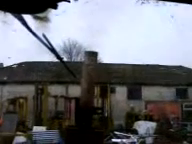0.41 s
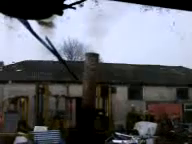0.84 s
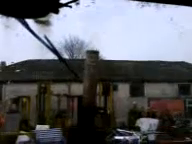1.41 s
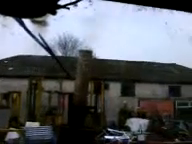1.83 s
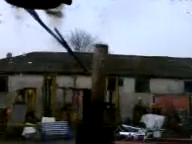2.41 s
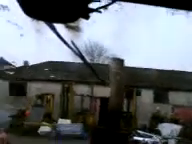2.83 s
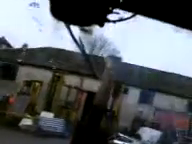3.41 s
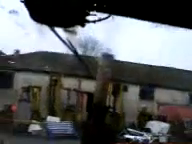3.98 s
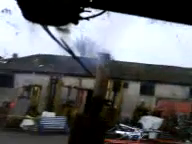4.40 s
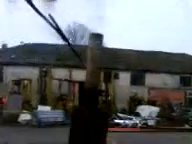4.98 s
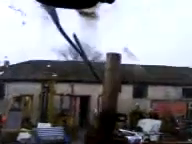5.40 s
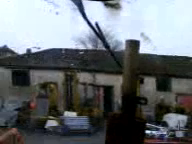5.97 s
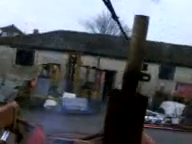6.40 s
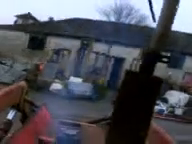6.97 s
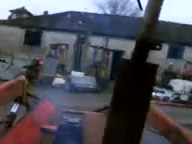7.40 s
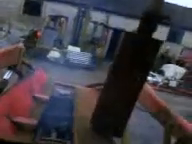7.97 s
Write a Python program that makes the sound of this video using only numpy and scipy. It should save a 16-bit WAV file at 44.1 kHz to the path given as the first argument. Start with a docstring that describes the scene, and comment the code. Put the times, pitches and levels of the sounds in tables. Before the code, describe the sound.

For the whole 8 seconds an old four-cylinder diesel tractor idles cold, heard close from inside its cab. From 0 s it is already running: exhaust firings at roughly 40 a second merge into a low throbbing boom over soft rumble, with cab air resonating. Above it valve gear knocks in a lurching pattern repeating about ten times a second, each knock a short gritty burst in loose metal, with small pings. Idle speed hunts slightly and harshness swells and eases, rough near 1 s, milder around 1.5 and 3.5 s. At 3.7 s the microphone swings and fuel-pipe rattle steps forward, the boom thinner. From 6.2 to 6.9 s it turns, bringing out a ringing rocker cover and a slightly higher panel note; clatter is harsh around 7 s. Irregular hard knocks jump out throughout. The sound is loud, compressed, lacking deep bass and treble, with flattened peaks; the engine is still running at the end.

```python
"""An old four-cylinder diesel tractor idles cold and uneven, heard from inside its cab for 8 seconds.
From the start, firings boom in the exhaust and cab over a low rumble (damped resonances, filtered noise).
The valve gear knocks in a pattern repeating every two crank turns, as bursts of noise in loose metal.
At 3.7 s the narrow-band microphone swings toward the fuel pipes; from 6.2 to 6.9 s it turns to the panel
and cover. All along, single hard knocks stick out and the highest peaks are cut flat."""
import sys
import numpy as np
from scipy import signal
from scipy.fft import rfft, irfft
from scipy.io import wavfile
from scipy.ndimage import uniform_filter1d

SR = 44100
rng = np.random.default_rng(int(sys.argv[2]) if len(sys.argv) > 2 else 0)


def ratio_of_db(decibels):
    """Turn decibels (scalar or array-like) into linear amplitude factors; 0 dB maps to 1."""
    return 10 ** (np.asarray(decibels, float) / 20)


def log_audio(samples):
    """Write samples as a 16-bit WAV file to the path given in sys.argv[1]."""
    # one column per channel
    frames = np.atleast_2d(samples).T
    # limit to full scale, then quantise
    limited = np.clip(frames, -1, 1)
    pcm = np.round(limited * 32767).astype(np.int16)
    wavfile.write(sys.argv[1], SR, pcm)


N = 356328
T = np.arange(N) / SR  # seconds
HZ = np.fft.rfftfreq(N, 1 / SR)
CYCLES = 84  # enough engine cycles to cover the scene, counted from -1
SWING_AT_S = 3.7  # the microphone swings from the exhaust side toward the fuel pipes
# When the microphone turns to face the panel and cover: start in seconds, end in seconds.
TURN_S = (6.2, 6.9)


def evened(x):
    """Scales a sound to an rms of 1."""
    return x / np.sqrt(np.mean(x ** 2) + 1e-20)


def steadied(x):
    """Divides a sound by its own rms over half a second, so slow level changes vanish."""
    return x / np.sqrt(uniform_filter1d(x ** 2, SR // 2))


def read(points):
    """Turns a (Hz, dB) curve into a gain at every frequency."""
    f, db = np.transpose(points)
    return ratio_of_db(np.interp(np.log(HZ + 1), np.log(f + 1), db))


def coloured(x, gain):
    """Filters a sound by a gain at every frequency."""
    return irfft(rfft(x) * gain, N)


def resonate(x, hz, width):
    """A resonance of gain 1: shifts the pitch hz down to zero, smooths, and shifts back."""
    turn = np.exp(2j * np.pi * np.cumsum(hz) / SR)
    r = np.exp(-np.pi * width / SR)
    smooth = signal.lfilter([1 - r], [1, -r], x / turn)
    return 2 * (turn * smooth).real


def cycles_done():
    """Adds up the crank speed; one cycle is two crank turns, with four firings."""
    # The governor hunts between a slow and a quick idle.
    # Each row: start in seconds, crank speed in turns per minute (held until the next row).
    speed = [(0, 1181.5), (1.2, 1198.5), (1.6, 1183.2), (2.0, 1194.9), (2.4, 1181.55), (3.2, 1209),
             (3.8, 1191), (4.0, 1182), (4.6, 1202.7), (5.0, 1196.4), (5.8, 1206.2), (6.4, 1200),
             (6.6, 1187.4), (7.0, 1205.1), (7.4, 1202.5)]
    s, rpm = np.transpose(speed)
    rpm_now = rpm[np.searchsorted(s, T, "right") - 1]
    return -.971 + np.cumsum(rpm_now) / (2 * 60 * SR)  # begins just after the start of cycle -1


def heard(db, per_harsh, per_sway, swing_db, turn_db):
    """Gain of one layer as the knocking grows harsher or milder and the microphone moves."""
    # How hard the cold engine knocks. Each row: time in seconds, harshness in dB.
    harsh_points = [(0, 1.5), (.85, 0), (.95, 4.5), (1.1, 1), (1.45, -3.5), (1.75, 0.5), (2.25, -1),
                    (2.7, 1), (2.9, 0), (3.1, 0.5), (3.45, -3.5), (3.75, -4), (4.05, 1), (4.4, -1),
                    (4.65, 2), (4.9, -3.5), (5.15, 1), (5.55, -2.5), (5.75, 0.5), (6.5, -2), (6.85, 4),
                    (7.15, 4.5), (7.35, -0.5), (7.65, 1.5), (8.08, 0.5)]
    # The hand-held microphone sways toward and away from the panel and block.
    # Each row: time in seconds, sway in dB.
    sway_points = [(0, 4), (.15, 3), (.6, -1), (.9, 1.5), (1.25, 1.5), (1.45, -3.5), (2.05, 4),
                   (2.15, -1.5), (2.5, 0), (3.15, 1.5), (3.85, -3), (4.05, 1), (4.75, -0.5), (4.95, -3.5),
                   (5.6, -2), (6.2, -0.5), (6.6, 2), (7.25, 3), (7.4, 0.5), (7.75, 2), (8.08, -0.5)]
    harsh = np.interp(T, *np.transpose(harsh_points))
    sway = np.interp(T, *np.transpose(sway_points))
    swing = swing_db * (T > SWING_AT_S)
    turn = turn_db * np.interp(T, TURN_S, [0, 1])
    return ratio_of_db(db + per_harsh * harsh + per_sway * sway + swing + turn)


def blows(places, sizes, jitter_s, spread_db, chance):
    """One impulse at each place of every cycle, a little off in time and strength."""
    cycle = np.arange(CYCLES)[:, None] - 1 + places
    when = np.interp(cycle, cycles_done(), T, -1, 99)  # -1 and 99 s fall outside the scene
    when = when + jitter_s * chance[..., 0]
    at = np.round(when * SR).astype(int)
    size = sizes * ratio_of_db(spread_db * chance[..., 1])
    inside = (at >= 0) & (at < N)
    return np.bincount(at[inside], size[inside], N)


def ring(table, modes, jitter_s, spread_db):
    """Impulses set damped air resonances ringing."""
    place, size = np.transpose(table)
    hits = blows(place, size, jitter_s, spread_db, rng.standard_normal((CYCLES, len(table), 2)))
    s = 1j * HZ
    body = 0
    for f, width, db, way in modes:
        body = body + way * ratio_of_db(db) * width / 2 * s / ((s + width / 2) ** 2 + f ** 2)
    too_high = 1 + (HZ / 400) ** 4
    too_low = 1 + (60 / (HZ + 1)) ** 6
    return coloured(hits * SR / 20, body / too_high / too_low)


def rumble():
    """Turbulence: steady low noise, strongest around 50 to 80 Hz and 160 Hz, under the boom."""
    # Each row: frequency in Hz, gain in dB.
    spectrum = [(20, -20), (35, -12), (50, -0.5), (68, -2.5), (80, 1), (120, -4), (160, 5), (210, -7.5),
                (260, -8.5), (400, -46.5)]
    return ratio_of_db(-31) * evened(coloured(rng.standard_normal(N), read(spectrum)))


def exhaust_boom():
    """Each firing sends a pressure pulse into the exhaust, whose air rings at a few low notes."""
    # Each row: place in the cycle from 0 to 1, relative strength.
    firings = [(.038, 1.03), (.294, 1.12), (.537, 1.21), (.790, .65)]
    # Each row: frequency in Hz, width in Hz, relative level in dB, push +1 or pull -1.
    exhaust = [(88.9, 8, -17.8, 1), (115.8, 8, -32.8, 1), (161.6, 9.4, -27.5, -1), (185.3, 12.3, -28.4, -1)]
    # Upper note of the pipe: level in dB, dB per dB of harshness, dB per dB of sway,
    # dB gained by the swing, dB gained by the turn.
    pipe_note = (-14, 1.4, -0.8, -16.5, -6.5)
    tones = ring(firings, exhaust, jitter_s=0.00046, spread_db=1.27)
    return tones + heard(*pipe_note) * resonate(tones, 158 + 0 * T, width=34)


def cab_boom():
    """The crank jolts the cab twice a cycle, and the air inside rings."""
    # Each row: place in the cycle from 0 to 1, relative strength.
    crank_jolts = [(.267, 1.0), (.770, .70)]
    # Each row: frequency in Hz, width in Hz, relative level in dB, push +1 or pull -1.
    cab = [(101, 9.8, -23.7, 1), (138.3, 8, -43, 1), (207, 8, -24.7, 1), (342, 12, -30.5, 1)]
    # Cab against exhaust: level in dB, dB per dB of harshness, dB per dB of sway,
    # dB gained by the swing, dB gained by the turn.
    cab_share = (-0.6, 0.62, -0.3, -1.3, 1.1)
    return heard(*cab_share) * ring(crank_jolts, cab, jitter_s=0.00047, spread_db=1.5)


def boom():
    """Exhaust and cab ring together, at a level that follows the harshness and the microphone."""
    # Both together: level in dB, dB per dB of harshness, dB per dB of sway,
    # dB gained by the swing, dB gained by the turn.
    boom_level = (-17, -0.47, 0.27, -1.5, -0.8)
    return heard(*boom_level) * steadied(exhaust_boom() + cab_boom())


def pings(shake, lo_hz, hi_hz, per_s, t60):
    """Loose nuts, clips and rods: short rings at eight pitches, struck more often while the part shakes."""
    struck = rng.random(N) < per_s / SR * evened(shake)
    strength = struck * shake * rng.standard_normal(N)
    which = rng.integers(0, 8, N)
    t = T[:2000]
    out = np.zeros(N)
    for k, hz in enumerate(np.geomspace(lo_hz * 1.05, min(hi_hz, 3500) * .95, num=8)):
        note = ratio_of_db(-60 * t / t60) * np.sin(2 * np.pi * hz * t)
        out += signal.oaconvolve(strength * (which == k), note)[:N]
    return out


def with_notes(k, part):
    """Adds the notes that part number k holds because its metal resonates."""
    # Loose panel: pitch in Hz before the turn, pitch in Hz after it.
    panel_hz = (533, 555)
    # Fuel pipes: pitch in Hz before the swing, pitch in Hz after it.
    pipes_hz = (1690, 1740)
    # Note of the rocker cover: level in dB, dB per dB of harshness, dB per dB of sway,
    # dB gained by the swing, dB gained by the turn.
    cover_ring = (-2.5, -1.5, 0.8, -3.5, 9.5)
    if k == 0:  # engine block
        low, high = resonate(part, 328 + 0 * T, width=50), resonate(part, 392 + 0 * T, width=30)
        return part + 1.6 * low + .4 * high
    if k == 1:  # loose panel
        return part + 4.7 * resonate(part, np.interp(T, TURN_S, panel_hz), width=40)
    if k == 2:  # rocker cover
        return part + heard(*cover_ring) * resonate(part, 850 + 0 * T, width=65)
    if k == 3:  # fuel pipes
        pitch = np.where(T > SWING_AT_S, pipes_hz[1], pipes_hz[0])
        return part + 0.59 * resonate(part, pitch, width=310)
    return part  # the tick holds no note


def clatter():
    """Every knock shakes each part into a dying burst of gritty noise; some parts hold a note."""
    # Valve gear and injectors; the knocks at .05, .28 and .785 are among the stronger.
    # Each row: place in the cycle from 0 to 1, dB into block, panel, cover, pipework and tick,
    # dB into the panel once the microphone has turned.
    knocks = [(.05, -6, -9, 1, 1, 3, -4), (.136, -11, -14, -4, -4, -3, 2), (.2, -14, -25, -5, -6, -5, -12),
              (.28, 2, -1, -2, -2, -1, 2), (.37, -5, -13, -9, -9, -12, -6), (.428, -7, 3, -8, -9, -9, -9),
              (.545, -11, -11, -9, -8, -6, -2), (.66, -12, -20, -14, -14, -12, -20),
              (.785, -8, -8, 0, 1, -1, -4), (.86, -2, -10, -4, -6, -6, -4), (.95, -14, -8, -5, -5, -6, -8)]
    # What a knock sets ringing: block, panel, cover, pipework, tick.
    # Each row: low edge in Hz, high edge in Hz, decay time constant in seconds, steady shaking in dB,
    # rough knock-to-knock spread in dB, share that repeats every cycle from 0 to 1,
    # strength of the bare blow, level of short metal pings in dB.
    parts = [(246, 616, 0.011, -10, 2, 0.7, 15, -33.5), (420, 710, 0.011, -14.5, 1.0, 0.7, 24, -39),
             (680.5, 1507, 0.009, -3, 2, 0.2, 16, -12), (1316, 2196, 0.009, -2.5, 2, 0, 6.6, -9),
             (2184, 8700, 0.0088, -6.5, 2.5, 0.3, 11, -10)]
    # Colour of the clatter. Each row: frequency in Hz, gain in dB.
    spectrum = [(140, -29), (230, 7), (267, -7), (321, -2.5), (459, -7), (539, -8.5), (656, -7),
                (872, -9.5), (1140, -6.5), (1460, -12.5), (1780, -11), (2200, -11), (3070, -14),
                (3390, -17.5), (4390, -19), (5710, -83.5), (9660, -120)]
    # How each part is heard. Each row: level in dB, dB per dB of harshness, dB per dB of sway,
    # dB gained by the swing, dB gained by the turn.
    part_levels = [(-26, 0.5, 0.1, -1.5, -0.3), (-25.5, 0.1, 1.2, 1.26, -1), (-23, 0.64, -0.2, -0.2, 1),
                   (-26.5, 0.91, -0.32, 4, -1), (-26.5, 0.8, -0.15, 1, -1.5)]
    place, *into_db = np.transpose(knocks)
    shared = rng.standard_normal((CYCLES, len(knocks), 2))  # a hard knock is hard in all parts
    shared[..., 1] += .8 * rng.standard_normal((CYCLES, 1))  # cold running: whole cycles strong or weak
    grit = ratio_of_db(3.7 * rng.exponential(1, N)) * (rng.random(N) < 1500 / SR)  # about 1500 grains a second
    done = cycles_done()
    habit = rng.standard_normal(4410)[(done % 1 * 4410).astype(int)]  # same rattle at the same crank angle
    turn_cycles = np.interp(TURN_S, T, done)
    turned = np.interp(np.arange(CYCLES) - 1, turn_cycles, [0, 1])[:, None]
    t = T[:8000]
    out = np.zeros(N)
    for k, (lo_hz, hi_hz, decay, steady_db, spread_db, same, blow, ping_db) in enumerate(parts):
        chance = 0.9 * shared + 0.43 * rng.standard_normal(shared.shape)
        after_db = into_db[5 if k == 1 else k]  # only the panel's knocks change with the turn
        db = (1 - turned) * into_db[k] + turned * after_db
        hits = blows(place, ratio_of_db(db), 0.0002, spread_db, chance)
        burst = np.exp(-t / decay) * (1 - np.exp(-t / 0.00062))  # quick rise, then decay
        shake = ratio_of_db(steady_db) + signal.oaconvolve(hits, burst)[:N]
        fresh = rng.standard_normal(N) * (1 + 0.64 * grit)
        rattle = same * habit + np.sqrt(1 - same ** 2) * fresh
        drive = shake * rattle + blow * hits
        drive += ratio_of_db(ping_db) * pings(shake, lo_hz, hi_hz, per_s=600, t60=0.037)
        band = 1 / np.sqrt((1 + (lo_hz / (HZ + 1)) ** 12) * (1 + (HZ / hi_hz) ** 12))
        part = with_notes(k, coloured(drive, band * read(spectrum)))
        out += heard(*part_levels[k]) * steadied(part)
    return out


def hard_knocks():
    """The loudest single knocks: each a short sharp blow that dies within about one swing."""
    # Each row: time of the peak in seconds, peak level in dB, push +1 or pull -1.
    knock_list = [(0.1047, -0.7, 1), (0.1335, -1.8, -1), (0.2352, -1.1, -1), (0.311, -1.3, -1),
                  (0.4384, -1.9, -1), (0.6415, -1.9, -1), (0.9212, -1.1, -1), (0.9461, -0.7, -1),
                  (1.124, -1.6, -1), (1.2508, -0.8, -1), (1.3048, -1.3, 1), (1.3502, -0.8, -1),
                  (1.4496, -1.0, -1), (1.7772, -2.2, -1), (1.8538, -2.2, -1), (2.836, -0.8, 1),
                  (3.144, -3.1, -1), (3.2424, -1.4, 1), (3.8651, -2.0, -1), (3.9666, -0.6, -1),
                  (4.0675, -2.2, -1), (4.6553, -1.0, 1), (4.7026, -0.6, -1), (5.0539, -2.0, 1),
                  (5.3317, 0.2, 1), (5.68, -0.1, 1), (5.9266, -1.1, -1), (5.9548, 0.5, 1),
                  (6.5487, -0.4, -1), (6.8729, -0.4, -1), (7.7319, -1.4, 1), (7.7763, -1.3, -1)]
    s, db, way = np.transpose(knock_list)
    lead = .0003  # seconds of rise ahead of the peak
    t = T[:600] - lead
    envelope = np.where(t < 0, 1 + t / 0.00079, np.exp(-t / 0.00033))
    blow = np.cos(2 * np.pi * 1100 * t) * envelope
    hits = np.bincount(np.round((s - lead) * SR).astype(int), way * ratio_of_db(db), N)
    return signal.oaconvolve(hits, blow)[:N]


def scene():
    """The engine as it reaches the cab; a hard knock takes the place of the roar for an instant."""
    # Ordinary peaks of the roar round off toward this height (full scale is 1).
    rounded_at = .66
    knocks = hard_knocks()
    roar = rumble() + boom() + clatter()
    roar = roar / (1 + (roar / rounded_at) ** 6) ** (1 / 6)
    taken = np.clip(7 * uniform_filter1d(abs(knocks), 50), 0, 1)
    return (roar * (1 - taken) + knocks)[None]


def band_limit(x):
    """A steep low-pass at the top of the band."""
    return signal.sosfilt(signal.butter(12, 15850, fs=SR, output="sos"), x)


def record(dry):
    """The microphone: gain control evens the bursts, deep bass and treble are lost, peaks clip flat."""
    power = signal.lfilter([.004], [1, -.996], dry[0] ** 2)  # memory of 6 ms
    power_db = 10 * np.log10(power + 1e-9)
    over_db = np.maximum(power_db + 17.0, 0)  # above -17 dB the gain is eased down
    evened_out = dry[0] / ratio_of_db(0.43 * over_db)
    response = [(10, -39.0), (40, -2.5), (66, 0.0), (76, 2.5), (3300, 0), (3800, -10.5),
                (4400, -28.5), (4600, -48), (4800, -100)]  # Hz, dB
    narrow = coloured(evened_out, read(response))
    flat = np.clip(narrow, -.708, .708)
    return band_limit(flat[None])


dry = scene()
out = record(dry)
log_audio(out)
```